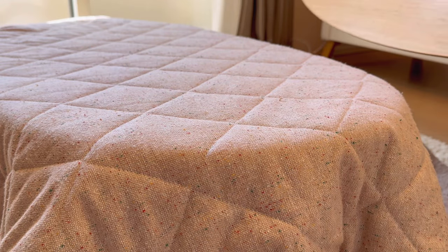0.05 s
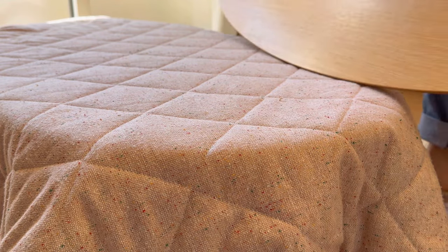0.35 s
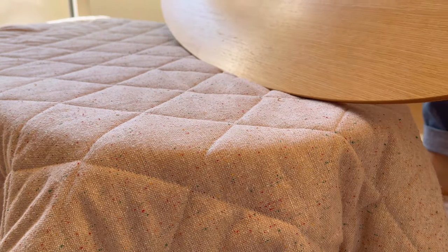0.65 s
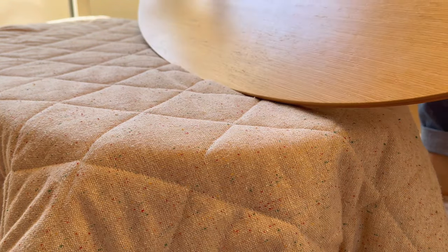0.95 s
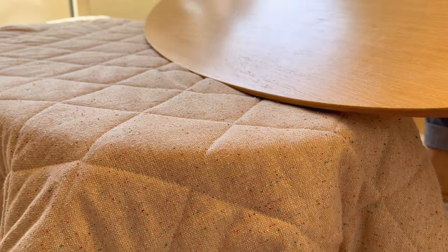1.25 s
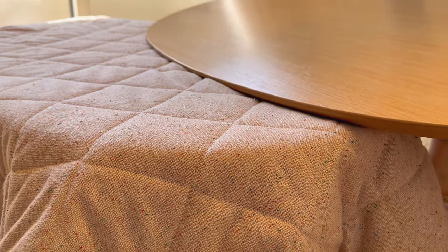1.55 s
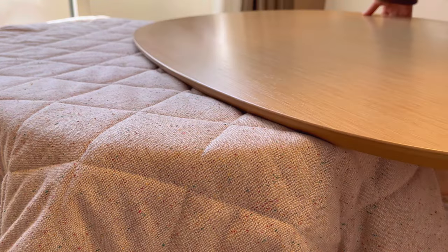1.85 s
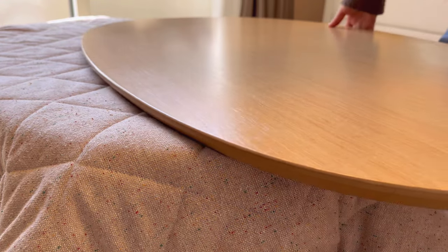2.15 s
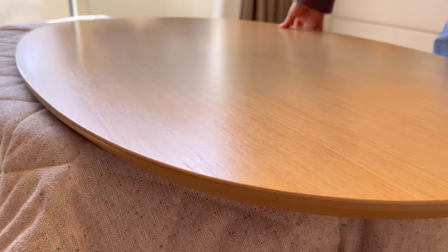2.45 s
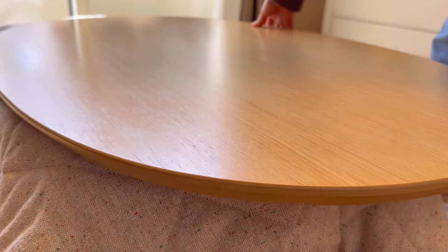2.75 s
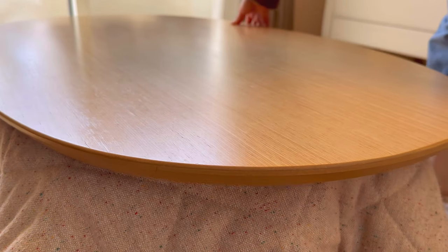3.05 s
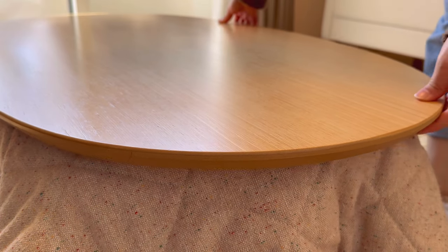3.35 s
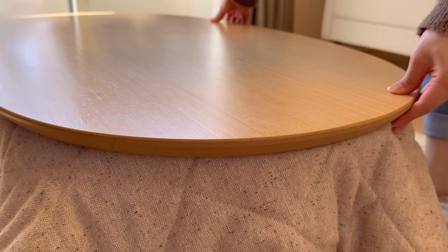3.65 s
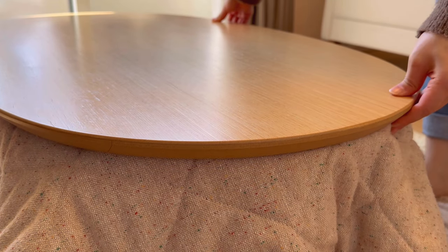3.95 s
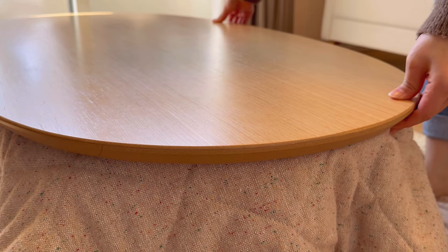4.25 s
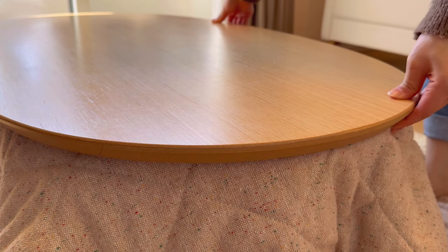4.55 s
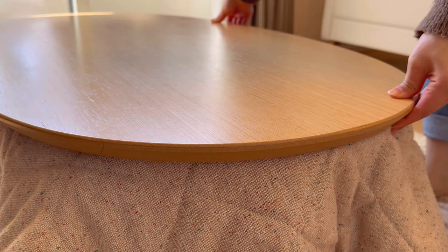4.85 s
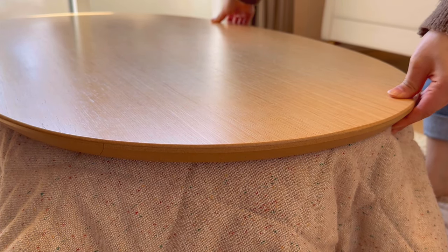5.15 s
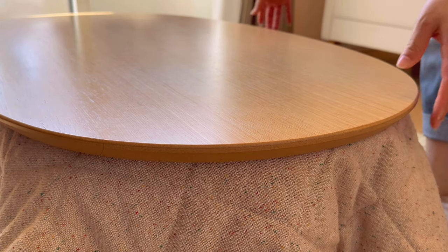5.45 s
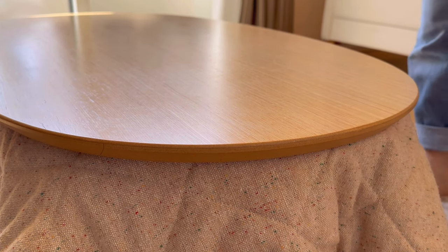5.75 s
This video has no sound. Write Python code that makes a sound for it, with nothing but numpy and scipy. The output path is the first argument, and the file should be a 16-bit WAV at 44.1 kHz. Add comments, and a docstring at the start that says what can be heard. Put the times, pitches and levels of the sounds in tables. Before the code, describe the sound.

A dull wooden knock and muffled thump, then a board sliding softly across quilted fabric in a small, quiet room.

```python
"""In a small room, a round wooden tabletop is lowered onto a quilted futon, pushed across it
and nudged into place. The padded landing makes the room boom. Cloth hisses under the sliding board,
which shakes and knocks softly while its edge digs in. Fingers tick on the rim and clothes rustle
as the hands let go. The house rumbles faintly behind it all."""
import sys
import numpy as np
from scipy import signal
from scipy.fft import rfft, irfft
from scipy.io import wavfile
from scipy.ndimage import uniform_filter1d

SR = 44100
rng = np.random.default_rng(int(sys.argv[2]) if len(sys.argv) > 2 else 0)


def to_wav(sig):
    """Store sig (one row per channel, or 1-D mono) as 16-bit WAV at the path in sys.argv[1].

    Samples outside -1..1 are clipped; the rate is SR.
    """
    pcm = np.clip(np.atleast_2d(sig), -1, 1) * 32767
    pcm = np.round(pcm).astype(np.int16)
    wavfile.write(sys.argv[1], SR, pcm.T)  # frames by channels


N = 264600
T = np.arange(N) / SR  # time of each sample [s]
HZ = np.maximum(np.arange(N // 2 + 1) * SR / N, 1)  # frequencies of a spectrum [Hz]

# tone of the still room (frequency [Hz], level [dB])
AIR_TONE = [(15, -35), (25, -7.5), (58, 0.5), (99, -10), (144, -15), (183, -23), (215, -22), (349, -23.5),
            (378, -23.5), (433, -27.5), (523, -27.5), (648, -34.5), (1530, -37), (2630, -43.5),
            (15500, -57.5)]
# stereo width of the room's sound (frequency [Hz], side compared with middle [dB])
AIR_WIDTH = [(60, -17), (125, -9), (250, -10.5), (600, 0), (12000, -6)]
# low notes at which the room booms (frequency [Hz], level [dB], time to fade by 60 dB [s])
ROOM_NOTES = [(46, -3, .57), (50.8, -2, .9), (64, -13, .8), (77.7, -3.8, .65), (87.9, -7, .75),
              (101, 8.5, .25)]
# notes at which the tabletop rings (frequency [Hz], level [dB], time to fade by 60 dB [s])
BOARD_NOTES = [(115, -1, 0.12), (152.6, 2.5, 0.11), (181.4, 0.5, 0.15), (216, -1, 0.097),
               (244, -3.5, 0.176), (280, -9, 0.044), (345, -9.5, 0.065), (405.7, -11, 0.22),
               (454, -13.5, 0.4)]
# tone of the rubbing cloth (frequency [Hz], level [dB])
CLOTH_TONE = [(200, -8.5), (400, -14.5), (650, -3.5), (950, -3), (1450, 0.5), (2350, 0.5), (3200, -3),
              (4300, -5), (5400, -6.5), (6500, -10.5), (7600, -8.5), (9100, -4.5), (12000, -12),
              (15500, -14)]
# stereo width of the rubbing (frequency [Hz], side compared with middle [dB])
CLOTH_WIDTH = [(200, -12), (600, -2.5), (1300, -0.5), (2400, -2), (4400, -0.5), (8000, 2), (11000, -12),
               (15000, -3)]
# narrow bands that ring in the gap under the board (frequency [Hz], width [Hz], level [dB])
GAP_BANDS = [(1554, 67, -24), (1920, 140, -20), (2500, 330, -15), (6530, 820, 0.5), (10760, 1040, -7)]
# tone of the scuffed padding (frequency [Hz], level [dB])
PADDING_TONE = [(150, -23), (300, 0.5), (450, 6.5), (650, -0.5), (1150, -3), (1700, -10.5), (3500, -26.5)]
# the rim skims the weave (time [s], half length [s], level [dB], frequency [Hz], width [Hz])
WEAVE_ZIPS = [(.458, .024, -58, 9000, 12000), (1.715, .04, -59, 10300, 3500), (2.2, .19, -61, 4800, 4500),
              (2.535, .018, -56, 2400, 1000), (2.6, .09, -62, 11500, 7000),
              (2.665, .045, -54.5, 6600, 1000), (4.04, .11, -68, 4100, 2500)]
# short strokes over the cloth, the last by sleeves and legs (start [s], end [s], level [dB],
# swell [dB], extra treble [dB], brightening [dB], steepness of start and stop [dB/s])
SHORT_STROKES = [(0, 0.187, -68, 1.5, -2, -2, 134), (0.323, 0.363, -72, 3, -2.5, 3, 200),
                 (0.451, 0.489, -58.5, -2.5, -2, 3.5, 333), (0.67, 0.83, -63.5, 3, 0.5, -4, 101),
                 (0.893, 0.988, -60, 0, -9, -9, 142), (3.955, 4.16, -60.7, .5, -1.5, -1, 240),
                 (4.475, 4.55, -79, -0.5, -7, 4, 75), (4.812, 4.865, -66.3, 2, -7, -1, 270),
                 (5.197, 6.003, -75.5, 17, 3.5, -2.5, 70)]
# the long push that slides the board into place (time [s], level [dB], extra treble [dB])
LONG_PUSH = [(1.19, -62.5, -2.5), (1.35, -61, 0.5), (1.42, -65.5, 2.5), (1.75, -61.5, 4),
             (1.84, -62.5, 1.5), (2.04, -57.5, 0.5), (2.52, -55.5, 1.5), (2.65, -58, 5),
             (2.81, -59.5, -1.5), (3.6, -60.5, -1), (3.68, -60.5, -5)]
# the edge's share of the rubbing, falling as the board comes to lie flat (time [s], share [dB])
EDGE_SHARE = [(.3, -1.5), (1.4, -12), (2.0, -7.5), (2.9, -15.5), (3.6, -21)]
# the edge digs into the quilt (start [s], end [s], shaking level [dB], scuffing level [dB])
EDGE_DIGS = [(0, .03, -61, -65), (0.468, 0.502, -50.5, -65), (0.677, .88, -57, -89), (.9, 1.05, -66, -60),
             (1.19, 1.216, -55.5, -70), (1.264, 1.34, -59, -59), (1.38, 1.88, -57, -63.5),
             (2.203, 2.29, -59.5, -60.5), (2.89, 2.896, -67, -71)]
# fingers touch the rim (time [s], peak level [dB])
FINGER_TICKS = [(5.226, -53.5), (5.366, -57)]
# the wood knocks as its edge catches (time [s], peak level [dB], contact time [s])
EDGE_KNOCKS = [(.006, -38, 0.0022), (0.445, -27, 0.0042), (1.188, -47, 0.0018), (1.261, -44.5, 0.00039),
               (1.446, -43, 0.0014), (2.217, -53, .0004), (2.24, -51, 0.00022), (2.877, -63, .0005),
               (5.366, -54.5, 0.00021)]
# the board bumps into the padding, and at 1.83 s the wood gives a short higher knock (time of peak [s], peak
# level [dB], rocking frequency [Hz])
PADDED_BUMPS = [(0.016, -34, 83), (.055, -40.5, 83.5), (.332, -57, 61), (.479, -17, 65.6), (0.803, -47, 70),
                (1.751, -49, 52.4), (1.828, -41.5, 208), (2.294, -43.5, 70.6), (3.468, -53.5, 91),
                (3.942, -56, 68.5), (4.471, -56, 82.6), (5.22, -55, 62.6), (5.381, -55.5, 77.4)]


def gain(db):
    """Turn decibels into a number to multiply by."""
    return np.exp(np.asarray(db) * (np.log(10) / 20))


def unit(x):
    """Scale a signal to an average (rms) size of 1."""
    return x / np.sqrt(np.mean(x ** 2))


def curves(table):
    """Join a timed table's points with lines, giving one curve per column."""
    times, *columns = np.transpose(table)
    return [np.interp(T, times, column) for column in columns]


def colour(x, points):
    """Shape a sound's tone with (frequency [Hz], level [dB]) points."""
    hz, db = np.transpose(points)
    return irfft(rfft(x) * gain(np.interp(np.log(HZ), np.log(hz), db)), N)


def band(x, hz, width):
    """Let through one band of frequencies, at full strength in its centre."""
    return irfft(rfft(x) / (1 + 1j * (HZ ** 2 - hz ** 2) / (HZ * width)), N)


def ring(x, notes):
    """Let the pushes in x set a group of fading notes ringing."""
    t = T[:SR]
    response = sum(gain(db - 60 * t / fade_s) * np.sin(2 * np.pi * hz * t) for hz, db, fade_s in notes)
    return signal.fftconvolve(x, response)[:N]


def wander(per_s):
    """A smooth random wobble with a size near 1."""
    jagged = np.interp(T * per_s, np.arange(2048), rng.standard_normal(2048))
    return unit(uniform_filter1d(jagged, 200))


def stereo(middle, side, width):
    """Make left and right by adding and subtracting a side signal."""
    return middle + np.array([[1], [-1]]) * colour(side, width)


def slips(per_s, scatter_db):
    """Many tiny clicks of fibres letting go, a few much stronger than the rest."""
    happens = rng.random(N) < per_s / SR
    clicks = happens * rng.standard_normal(N)
    return unit(clicks * gain(scatter_db * np.minimum(rng.exponential(size=N), 5)))


def echo(x, fade_s, echo_db):
    """Add the short, blurred echo of the furnished room, different at each ear."""
    t = T[:SR // 2]
    tail = rng.standard_normal((2, len(t))) * gain(-60 * t / fade_s) * (t > .004)
    tail /= np.sqrt(np.sum(tail ** 2) / 2)
    return x + gain(echo_db) * signal.fftconvolve(np.atleast_2d(x), tail, axes=1)[:, :N]


def place(start, peak_db, sound):
    """Play a sound from a start time at a given peak level."""
    return gain(peak_db) * np.interp(T - start, T, sound / np.abs(sound).max(), left=0)


def fade(start, end, rise, fall):
    """Level [dB] that is 0 from start to end, with slopes [dB/s] before and after."""
    return -rise * np.maximum(start - T, 0) - fall * np.maximum(T - end, 0)


def together(levels):
    """Level [dB] of unrelated sounds heard at once."""
    return 20 * np.log10(np.sqrt(sum(gain(db) ** 2 for db in levels)) + 1e-12)


def room_air():
    """The house rumbles under a faint hiss; the rumble is fuller during the push."""
    noise = stereo(*colour(rng.standard_normal((2, N)), AIR_TONE), AIR_WIDTH)
    noise = unit(colour(noise, [(18, -32), (45, -11.5)]))
    rumble = colour(noise, [(100, -0.5), (250, -29), (600, -45)])
    swell_db = np.interp(T, [.4, 1.0, 3.4, 4.1], [-2.0, 3, -2, -3.5]) + 2 * wander(per_s=11)
    return (noise - rumble + rumble * gain(swell_db)) * gain(-62.5)


def finger_ticks():
    """Fingers touch the rim, each making a tiny burst of noise."""
    tone = [(500, -1), (2200, -4), (4000, -30), (9000, -5), (15000, -16)]
    tick = colour(rng.standard_normal(N), tone) * np.exp(-T / 0.002)
    ticks = sum(place(start, db, tick) for start, db in FINGER_TICKS)
    return echo(ticks, fade_s=0.18, echo_db=-11)


def weave_zips():
    """The rim skims the ribs of the weave in short, bright swishes."""
    zips = 0
    for time, half_length, db, hz, width in WEAVE_ZIPS:
        ribs = band(band(rng.standard_normal((2, N)), hz, width), hz, width)
        swell = np.exp(-((T - time) / half_length) ** 2)
        zips = zips + unit(stereo(*ribs, CLOTH_WIDTH)) * gain(db) * swell
    return zips


def edge_levels(rub_db):
    """Shaking and scuffing levels [dB]: they follow the rubbing and the tilt, and jump at each dig."""
    edge_db = rub_db + curves(EDGE_SHARE)[0]
    shakes, scuffs = [edge_db - 6], [edge_db - 1.5]
    for start, end, shake_db, scuff_db in EDGE_DIGS:
        easing_db = 13 * np.maximum(T - start, 0)  # a dig bites fast, then slowly eases
        bite_db = fade(start, end, rise=450, fall=140) - easing_db
        shakes.append(shake_db + bite_db)
        scuffs.append(scuff_db + bite_db)
    return together(shakes), together(scuffs)


def padding_scuff(level_db):
    """The tilted edge presses a fold through the padding with a dull, uneven scuff."""
    folds = [colour(slips(per_s=3500, scatter_db=1.0), PADDING_TONE) for _ in range(2)]
    return unit(stereo(*folds, CLOTH_WIDTH)) * gain(level_db + 0.5 + 0.63 * wander(per_s=30))


def board_shake(level_db):
    """The edge sticks and slips on the quilt, shaking the board and stirring the room's low notes."""
    wood = [ring(slips(per_s=1200, scatter_db=3.0), BOARD_NOTES) for _ in range(2)]
    board = unit(stereo(*wood, AIR_WIDTH))
    rumble = unit(ring(slips(per_s=1200, scatter_db=1.5), ROOM_NOTES))
    return (board + gain(-6) * rumble) * gain(level_db + 2.0)


def edge_knocks():
    """The edge catches and the tabletop rings; a longer contact gives a duller knock."""
    wood = sum(place(start, db, ring(T * np.exp(-T / contact_s), BOARD_NOTES))
               for start, db, contact_s in EDGE_KNOCKS)
    low_cut = signal.butter(2, 60, "high", fs=SR, output="sos")  # the knocks carry nothing below about 60 Hz
    return echo(signal.sosfilt(low_cut, wood), fade_s=0.38, echo_db=-7.0)


def rubbing_levels():
    """Body and hiss levels [dB]: each stroke speeds up, runs and stops, and is duller when slow."""
    push_speed_db = fade(LONG_PUSH[0][0], LONG_PUSH[-1][0], rise=170, fall=300)
    moves = [(push_speed_db, *curves(LONG_PUSH))]
    for start, end, db, swell, treble, brightening, steepness in SHORT_STROKES:
        progress = np.interp(T, [start, end], [-.5, .5])
        speed_db = fade(start, end, steepness, steepness)
        moves.append((speed_db, db + swell * progress, treble + brightening * progress))
    # between strokes the cloth shifts under the held board, more so when it is tilted
    share_db, = curves(EDGE_SHARE)
    creep_db = -87 + 0.4 * (share_db - share_db[-1])
    body, hiss = [creep_db], [creep_db + 2]
    for speed_db, db, treble in moves:
        body.append(db + speed_db)
        hiss.append(db + treble + 1.04 * speed_db)  # the hiss fades a little faster
    return together(body), together(hiss)


def cloth_rubbing(body_db, hiss_db):
    """Fibres slip under the board, making a soft rush and a high hiss; the grip is never even."""
    fibres = [colour(slips(per_s=26000, scatter_db=0.43), CLOTH_TONE) for _ in range(2)]
    cloth = echo(stereo(*fibres, CLOTH_WIDTH), fade_s=0.097, echo_db=-9.5)
    cloth = cloth + sum(gain(db) * band(cloth, hz, width) for hz, width, db in GAP_BANDS)
    body = colour(cloth, [(2800, 0.0), (5000, -6.5), (9000, -29.5)])
    hiss = cloth - body
    grip = gain(.5 * wander(per_s=24.87) + .5 * wander(per_s=140))
    return grip * (gain(body_db + 1.91) * unit(body) + gain(hiss_db + 1.0) * unit(hiss))


def padded_thumps():
    """The board sinks into the padding and rocks for a cycle or two; the room booms on after it."""
    rocking = 0
    for time, db, hz in PADDED_BUMPS:
        cycles = (T - time) * hz
        swell = np.exp(-(cycles / 1.18) ** 2)
        rocking = rocking - gain(db) * swell * np.cos(2 * np.pi * cycles)
    round_trip_s = .0357  # to the walls and back
    boom = np.interp(T - round_trip_s, T, ring(rocking, ROOM_NOTES), left=0)
    return (rocking + gain(-66) * boom) * gain([[-.35], [.35]])  # a touch louder on the right


def scene():
    """Everything heard from beside the table."""
    rub_db, hiss_db = rubbing_levels()
    shake_db, scuff_db = edge_levels(rub_db)
    sliding = cloth_rubbing(rub_db, hiss_db) + padding_scuff(scuff_db) + board_shake(shake_db)
    return sliding + weave_zips() + padded_thumps() + edge_knocks() + finger_ticks() + room_air()


def record(dry):
    """Steeply cut the highest treble, above 15720 Hz."""
    return signal.sosfilt(signal.ellip(10, .2, 70, 15720, fs=SR, output="sos"), dry)


dry = scene()
out = record(dry)
to_wav(out)
```